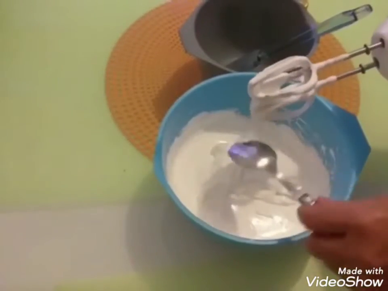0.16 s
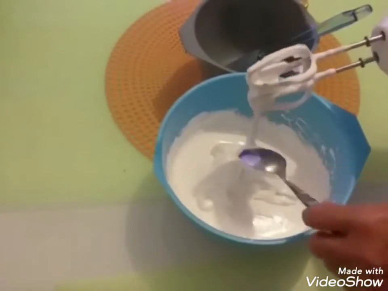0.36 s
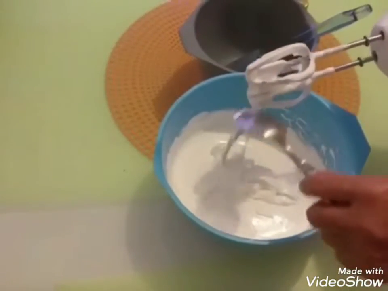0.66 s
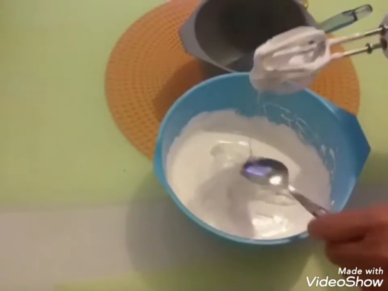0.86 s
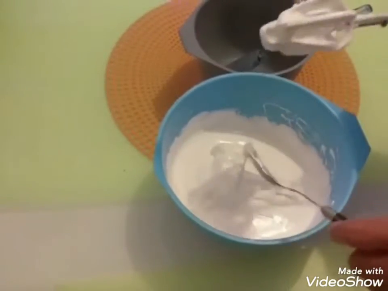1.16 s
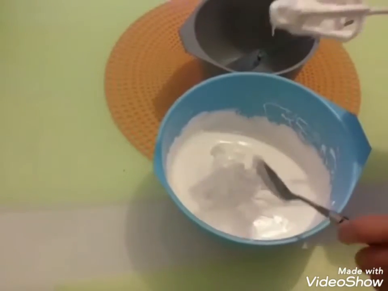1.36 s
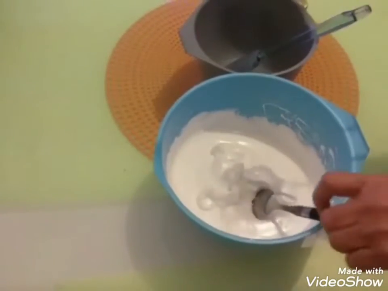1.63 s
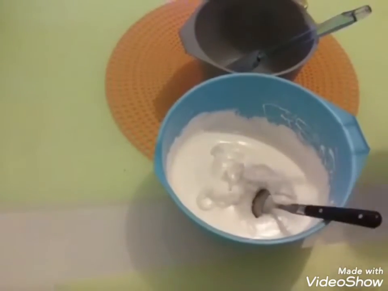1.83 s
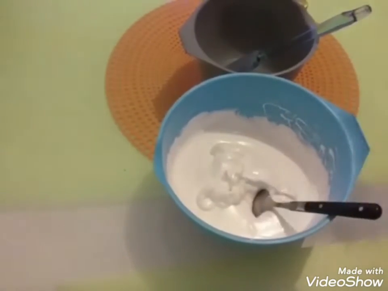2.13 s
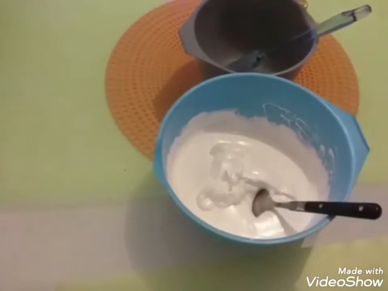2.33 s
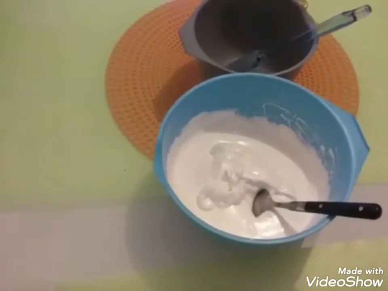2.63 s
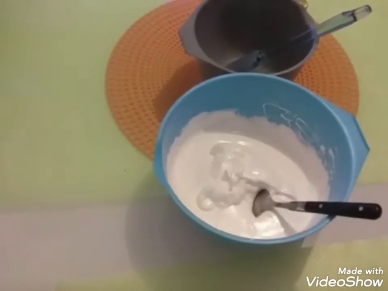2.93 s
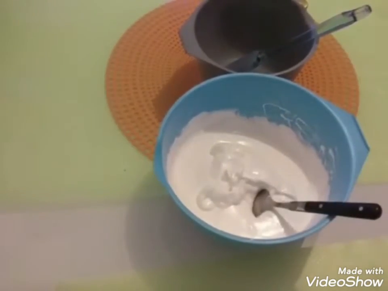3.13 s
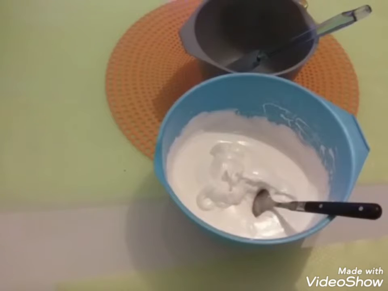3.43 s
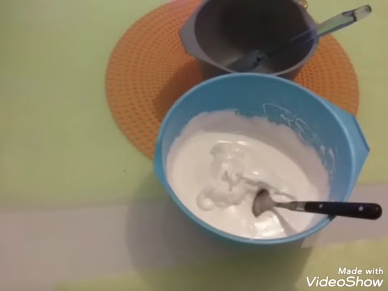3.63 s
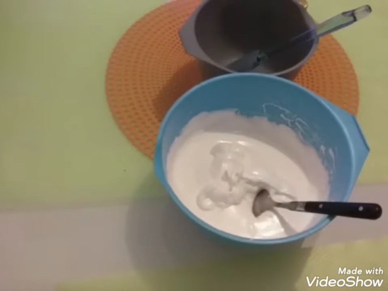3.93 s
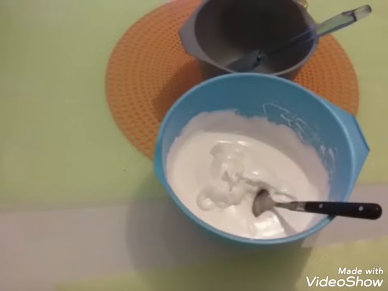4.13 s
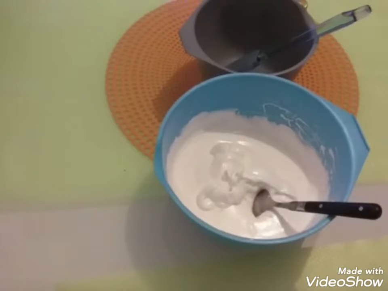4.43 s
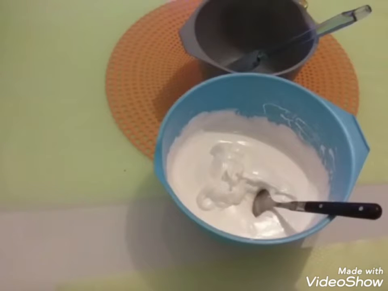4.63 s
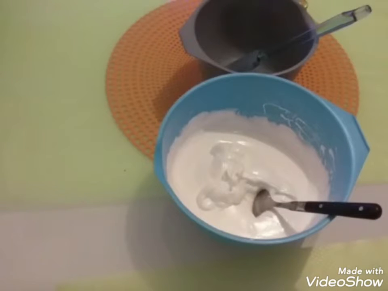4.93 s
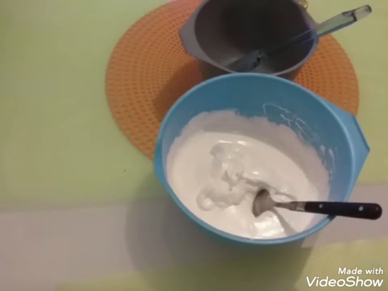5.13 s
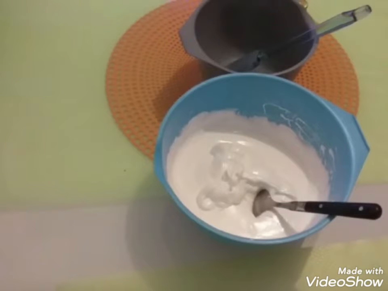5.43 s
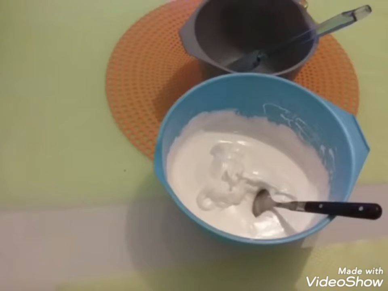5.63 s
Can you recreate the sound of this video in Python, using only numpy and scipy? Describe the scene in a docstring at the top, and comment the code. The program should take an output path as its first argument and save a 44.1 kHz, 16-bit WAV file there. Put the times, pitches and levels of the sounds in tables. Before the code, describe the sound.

Metal taps and a knock on a plastic bowl, followed by farther clinks, a bumping, squealing drawer and a loud cupboard bang.

```python
"""A steel spoon taps cream off mixer beaters and is laid in a plastic bowl, close to a phone in a
hard-walled kitchen. Further off, a utensil and a dish clink, sleeves rustle, a small thing is put
down, a drawer bumps along squealing runners, and a cupboard door bangs, followed by a softer thud.
Each impact excites a body's damped modes and the room's reverberation; the squeals are stick-slip
friction. Thin high chirps come and go over a low appliance hum."""
import sys
import numpy as np
from scipy import signal
from scipy.fft import rfft, irfft
from scipy.io import wavfile
from scipy.ndimage import uniform_filter1d

SR = 44100
rng = np.random.default_rng(int(sys.argv[2]) if len(sys.argv) > 2 else 0)


def wav_record(signal):
    """Record a signal, one row per channel, as 16-bit PCM in the file named by sys.argv[1]."""
    frames = np.transpose(np.atleast_2d(signal))
    bounded = np.clip(frames, -1, 1)
    # unit amplitude maps onto the largest positive 16-bit level
    quanta = np.round(bounded * 32767).astype(np.int16)
    wavfile.write(sys.argv[1], SR, quanta)


N = 254501
TIME = np.arange(N) / SR
RING = TIME[:SR]  # t/s within one event


def undb(db):
    """Amplitude ratio of a level in decibels."""
    return 10 ** (np.asarray(db) / 20)


def unit(x):
    """Normalisation to unit energy."""
    return x / np.sqrt(np.sum(x ** 2))


def at(points, hz):
    """Interpolation on a log-frequency axis."""
    f, value = np.transpose(points)
    return np.interp(np.log(np.maximum(hz, 1)), np.log(f), value)


def tint(x, colour, size=4096):
    """Minimum-phase filtering by a spectral envelope (f/Hz, gain/dB), through the folded cepstrum."""
    cepstrum = irfft(np.log(undb(at(colour, np.fft.rfftfreq(size, 1 / SR)))))
    cepstrum[1:size // 2] *= 2
    cepstrum[size // 2 + 1:] = 0
    return signal.fftconvolve(x, irfft(np.exp(rfft(cepstrum))))[:len(x)]


def noise(colour):
    """Filtered Gaussian noise of unit rms."""
    x = tint(rng.standard_normal(N), colour)
    return x / x.std()


def walk(rate):
    """Random modulation: `rate` Gaussian values a second, joined by lines."""
    knots = rng.standard_normal(int(N / SR * rate) + 2)
    return np.interp(TIME * rate, np.arange(len(knots)), knots)


def gesture(crest_s, rise_s, fade_db_per_s):
    """Envelope of a movement: Gaussian rise, exponential decay."""
    before, after = np.maximum(crest_s - TIME, 0), np.maximum(TIME - crest_s, 0)
    return np.exp(-2 * (before / rise_s) ** 2) * undb(-fade_db_per_s * after)


def add(track, start_s, sound, db, window_s):
    """Superposition of a sound, scaled so that its greatest short-time rms level is `db`."""
    peak_rms = np.sqrt(uniform_filter1d(sound ** 2, max(int(window_s * SR), 1)).max())
    start = int(start_s * SR)
    part = sound[max(-start, 0):N - start]
    track[max(start, 0):max(start, 0) + len(part)] += part * undb(db) / peak_rms


def kitchen(build_s=0.0003):
    """Diffuse reverberation: echoes build up, then decay exponentially, the treble first."""
    reverberation_times = [(100, 0.55), (400, 0.46), (1500, 0.55), (5000, 0.53), (9000, 0.44),
                           (16000, 0.23)]  # f/Hz, T60/s
    freqs, _, frames = signal.stft(rng.standard_normal(SR), SR, nperseg=256)
    age_s = np.linspace(0, 1, frames.shape[1])
    fade = np.exp(-np.log(1000) * age_s / at(reverberation_times, freqs)[:, None])
    tail = signal.istft(frames * fade)[1][:SR]
    return unit(tail * (1 - np.exp(-RING / build_s)) ** 2)


def ringing(modes, drive, beat_db, beat_rate, radians_per_db=0.83, scatter_db=1.5):
    """Damped modes store the drive's energy; interfering echoes make them beat in level and phase."""
    out = 0
    for hz, db, t60 in modes:
        energy = signal.lfilter([1], [1, -np.exp(-2 * np.log(1000) / (t60 * SR))], drive ** 2)
        swell = np.sqrt(energy) * undb(beat_db * walk(beat_rate)[:SR])
        tone = swell * np.sin(2 * np.pi * hz * RING + radians_per_db * beat_db * walk(beat_rate)[:SR])
        # each point of contact favours other modes
        out = out + undb(db + scatter_db * rng.standard_normal()) * unit(tone)
    return unit(out)


def blows(impacts, colour, modes, ring_db, beat_db=2.0, beat_rate=45, note_t60=0.015):
    """Impact excitation: contact chatter and its echoes drive a body and any note of the struck spot."""
    out = np.zeros(N)
    for start_s, level_db, contact_s, treble_db, room_db, *note in impacts:
        chatter = unit(RING / contact_s * np.exp(-2 * RING / contact_s) * rng.standard_normal(SR))
        drive = chatter + undb(room_db) * kitchen(build_s=contact_s)
        sound = unit(tint(drive, colour)) + undb(ring_db) * ringing(modes, drive, beat_db, beat_rate)
        if note:
            note_hz, note_db = note
            sound += undb(note_db) * ringing([(note_hz, 0, note_t60)], drive, beat_db, beat_rate)
        sound = tint(sound, [(800, 0.0018), (14000, treble_db)])  # harder contact, more treble
        add(out, start_s, sound, level_db, window_s=0.0002 + 2 * contact_s)
    return out


def squeaks(bursts, tones, waver, rasp_db, room_db):
    """Random frequency modulation: bursts of unsteady tones and rasp reverberate in the room."""
    out = np.zeros(N)
    for start_s, length_s, level_db in bursts:
        gate = np.sqrt(np.sin(np.pi * np.minimum(RING / length_s, 1)).clip(0))
        rasp = tint(rng.standard_normal(SR), [(tones[0][0] / 2, -60)] + list(tones))
        sound = undb(rasp_db) * unit(gate * rasp)
        for hz, db in tones:
            pitch_hz = hz * (1 + waver * walk(390)[:SR])
            sound += undb(db) * unit(gate * np.sin(2 * np.pi * np.cumsum(pitch_hz) / SR))
        echoes = undb(room_db) * signal.fftconvolve(sound, kitchen())[:SR]
        add(out, start_s, sound + echoes, level_db, window_s=0.0012)
    return out


def still_air():
    """Ambient noise floor: stationary and strongest in the bass."""
    colour = [(25, 0), (97, 2.5), (229, -12), (384, -10.5), (641, -33.5), (887, -8.5), (1650, -16),
              (3920, -21.5), (7710, -24), (9320, -31.5), (14800, -20), (16000, -32.5)]  # spectral envelope: f/Hz, gain/dB
    return undb(-68) * noise(colour)


def appliance_hum():
    """A line spectrum whose partials waver in amplitude and frequency."""
    partials = [(86.1, -72.5), (134.6, -69.5), (226.1, -83.5)]  # f/Hz, level/dB
    out = 0
    for hz, db in partials:
        amplitude = undb(db + 2.0 * walk(2.0))
        pitch_hz = hz * (1 + 0.024 * walk(46))
        out = out + amplitude * np.sin(2 * np.pi * np.cumsum(pitch_hz) / SR)
    return out


def movement_rumble(fade_db_per_s=33):
    """Low noise swells with each movement; incoherent swells add in power."""
    swells = [(0.021, .1, -62.5), (1.049, 0.41, -61), (1.95, 0.49, -56.5), (2.55, 0.88, -61),
              (3.53, 0.15, -63)]  # crest t/s, rise/s, relative level/dB
    rumble = noise([(35, -55), (85, 4), (135, -6), (200, -9), (400, -9.5), (900, -27.5), (3000, -44.5)])
    power = sum((undb(db) * gesture(s, rise_s, fade_db_per_s)) ** 2 for s, rise_s, db in swells)
    return undb(-2) * np.sqrt(power) * rumble


def high_chirps():
    """Thin bursts of high noise over weaker inharmonic partials."""
    chirps = [(1.11, 0.029, -57), (1.31, 0.029, -53.5), (2.545, 0.027, -44.5), (2.66, 0.076, -37.5),
              (4.0, 0.05, -34), (5.632, 0.088, -44)]  # t/s, length/s, level/dB
    partials = [(6352, -8.5), (8592, -7.5), (10290, -3), (10975, 0.5), (12204, 2), (13200, -8), (14200, 5),
                (15350, 8)]  # f/Hz, relative level/dB
    return squeaks(chirps, partials, waver=0.007, rasp_db=11, room_db=-2.0)


def sleeve_rustle(hiss_fade_db_per_s=61, sheen_fade_db_per_s=96):
    """Friction noise of cloth: swells of grainy hiss whose top-octave sheen decays first."""
    strokes = [(.89, 0.033, -60.5, -26), (1.425, 0.013, -67.5, -21), (1.883, 0.087, -52, -16),
               (2.01, 0.21, -61, 4.5), (2.13, 0.068, -51.5, -1.5), (2.23, .06, -64, 7),
               (2.97, 0.26, -58.5, -3), (3.085, 0.072, -50, -5), (3.29, 0.22, -62.5, 5),
               (3.46, 0.026, -56.5, -22.5), (3.601, 0.084, -43.5, -1), (3.81, .1, -58.5, -9),
               (3.93, 0.14, -75.5, 21)]  # crest t/s, rise/s, relative level/dB, sheen/dB
    colour = [(120, -11), (200, 4.5), (294, -23), (416, -7.5), (683, -0.5), (4770, 5), (7970, 2.5),
              (9060, -10.5), (15000, -43)]  # spectral envelope: f/Hz, gain/dB
    hiss_power, sheen_power = 0, 0
    for crest_s, rise_s, db, sheen_db in strokes:
        hiss_power += (undb(db) * gesture(crest_s, rise_s, hiss_fade_db_per_s)) ** 2
        sheen_power += (undb(db + sheen_db - 3) * gesture(crest_s, rise_s, sheen_fade_db_per_s)) ** 2
    sheen = noise([(8000, -20), (10500, 0), (16000, 0)])
    grain = undb(-1 + 1.5 * walk(170))
    return grain * (np.sqrt(hiss_power) * noise(colour) + np.sqrt(sheen_power) * sheen)


def small_knock():
    """Impact of a light thing put down: two weak modes, quickly damped."""
    knocks = [(3.158, -41.5, 0.0029, -12.5, 2.5)]  # t/s, level/dB, contact/s, treble/dB, room/dB
    colour = [(290, -49), (500, -19), (1130, -13), (1320, 0.5), (1800, -13), (2640, -9), (5000, -7),
              (16000, -23)]  # body response: f/Hz, gain/dB
    modes = [(1414, -2, 0.06), (2640, 1, .03)]  # f/Hz, level/dB, T60/s
    return blows(knocks, colour, modes, ring_db=-13)


def cupboard_thud():
    """A second, softer and duller impact on the cupboard excites heavily damped modes."""
    thuds = [(5.470, -25.5, 0.0042, -2, 15.5)]  # t/s, level/dB, contact/s, treble/dB, room/dB
    colour = [(35, -66), (60, -35), (125, -34), (180, -15), (330, 4), (579, -4.5), (924, -6.5), (1130, 3.5),
              (2100, -8.5), (3040, -18), (4200, -10.5), (16000, -46)]  # body response: f/Hz, gain/dB
    modes = [(118, 0, .1), (350, 5, .06), (775, 1, .04), (867, -3, .04), (1085, 1, .04), (1475, 0, .04),
             (1766, -3, .05), (2143, -4, .05)]  # f/Hz, level/dB, T60/s
    return blows(thuds, colour, modes, ring_db=-2, beat_db=3)


def runner_squeals():
    """Stick-slip friction makes the drawer's runners oscillate."""
    squeals = [(4.395, 0.032, -34), (4.52, 0.038, -32.5), (4.617, 0.025, -37), (4.76, 0.039, -39),
               (4.855, 0.028, -45), (5.225, 0.03, -45.5), (5.29, 0.023, -56)]  # t/s, length/s, level/dB
    partials = [(2565, 1.5), (5640, 13.5), (8950, -9.5), (10800, -1)]  # f/Hz, relative level/dB
    return squeaks(squeals, partials, waver=0.005, rasp_db=-7, room_db=-2.5)


def drawer_bumps():
    """Impacts excite the drawer's low resonances; its note changes as it moves."""
    bumps = [(4.036, -33, 0.007, 9.5, 13.5, 528, 0.5), (4.068, -36, 0.0054, 9.5, 18, 437, -5),
             (4.323, -44.5, 0.0037, 20, 20, 779, -2), (4.349, -36, 0.0041, 25, 10, 262.6, -3),
             (4.475, -31, 0.013, -3.5, -0.5, 396.6, -0.5), (4.55, -40.5, 0.031, 17, -3.5, 418, 3.5),
             (4.635, -41, 0.031, 3, 4, 487, 1), (4.68, -33, 0.0069, 32, 22, 782, -7),
             (4.715, -28.5, 0.0094, -7, 2.5, 387, 0), (4.742, -30, 0.0074, -20, -2.5, 664, -1.5),
             (4.991, -52.5, 0.014, 16, 3, 1400, -16)]  # t/s, level/dB, contact/s, treble/dB, room/dB, note f/Hz, note/dB
    colour = [(70, -24), (190, -10), (307, -8), (430, 2), (720, -8), (1100, -11.5), (2120, -15),
              (5200, -19.5), (7730, -28), (11900, -44.5), (16000, -35)]  # body response: f/Hz, gain/dB
    modes = [(246.2, -3.5, 0.07), (512, 3, 0.04), (750, -4, 0.04)]  # f/Hz, level/dB, T60/s
    return blows(bumps, colour, modes, ring_db=-4, beat_db=2.5, note_t60=0.04)


def cupboard_door():
    """Panel vibration: the door meets its frame, rattles and rebounds."""
    bangs = [(5.033, -20, 0.0085, 4, 0.5, 1890, -10), (5.038, -13.5, 0.013, 2.5, 0.5, 2532, -13.5),
             (5.046, -19, 0.0072, -3, -9, 794, 9), (5.068, -23.5, 0.018, -9, -4, 1079, 16),
             (5.134, -23, 0.013, -40, -2, 400, -7.5)]  # t/s, level/dB, contact/s, treble/dB, room/dB, note f/Hz, note/dB
    colour = [(40, -55), (70, -44), (118, -25), (227, -16.5), (350, -12.5), (600, -6.5), (1100, -11.5),
              (1700, -9), (2400, -9), (3700, -17), (7750, -25), (9300, -40.5), (16000, -42)]  # body response: f/Hz, gain/dB
    modes = [(118, -8, .12), (360, -3, .09), (490, -6, .2), (538, -7, .15), (788, -1, .04), (1085, 3, .09),
             (1269, -1, .06), (1395, 2, .07), (1573, 0, .04), (1701, 0, .07), (1860, -1, .04),
             (1978, 0, .06), (2023, 1, .07), (2145, 0, .07), (2535, -9, .05), (3200, -7, .06),
             (4967, -11, .04)]  # f/Hz, level/dB, T60/s
    return blows(bangs, colour, modes, ring_db=-1, beat_db=1.9, note_t60=0.07)


def dish_clink():
    """Light damping lets the struck dish ring on; closely spaced modes beat."""
    clinks = [(2.4455, -24, 0.0016, 11.5, 12)]  # t/s, level/dB, contact/s, treble/dB, room/dB
    colour = [(80, -21), (222, 8), (296, -20), (550, -17), (751, -6), (1140, -3.5), (1530, -6), (2220, -3),
              (2840, -17.5), (3240, -6), (7870, -18.5), (9200, -36.5), (16000, -44)]  # body response: f/Hz, gain/dB
    modes = [(1954, -9, 1.8), (1959.3, -19, 1.5), (3112, -7, .3), (3138, -6, .5), (3176, -4, .5),
             (1160, -4, .04), (2160, -2, .045), (3305, -7, .35), (3386, -9, .3), (4190, -10, .4),
             (4474, -8, .06), (4975, -10, .089), (6430, -13, .1)]  # f/Hz, level/dB, T60/s
    return blows(clinks, colour, modes, ring_db=-0.5, beat_db=1)


def utensil_clink():
    """A distant utensil rings; the reverberant field outweighs the direct sound."""
    clinks = [(2.2665, -29, 0.0012, 2, 27)]  # t/s, level/dB, contact/s, treble/dB, room/dB
    colour = [(240, -37), (900, -23.5), (1200, -7.5), (1650, -16.5), (2180, -10), (2500, -12), (4200, -11),
              (7900, -16), (9000, -29.5), (16000, -29)]  # body response: f/Hz, gain/dB
    modes = [(1200, -8, .06), (1970, -9, .08), (2215, -3, .1), (3085, -5, .12), (3290, -6, .1),
             (4020, -1, .08), (4470, -7, .12), (5030, -4, .1), (6130, -8, .1), (6550, -8, .1)]  # f/Hz, level/dB, T60/s
    return blows(clinks, colour, modes, ring_db=-1, beat_rate=110)


def spoon_on_bowl():
    """Damping in plastic: the bowl's modes die quickly, leaving the note of the struck spot."""
    knocks = [(-.03, -43.5, 0.0045, -29, -7, 232, 6), (1.6583, -27.5, 0.0019, 5.5, -0.5, 1100, -20),
              (2.123, -51.5, 0.0033, -2, -5.5, 271, -0.5)]  # t/s, level/dB, contact/s, treble/dB, room/dB, note f/Hz, note/dB
    colour = [(30, -41.5), (70, -4), (130, -14), (300, 2.5), (380, -4), (500, -2), (1200, -1),
              (2500, -16.5), (7600, -27), (16000, -82.5)]  # body response: f/Hz, gain/dB
    modes = [(905, 2.7, 0.032), (1270, 9.5, 0.021)]  # f/Hz, level/dB, T60/s
    return blows(knocks, colour, modes, ring_db=-8, note_t60=0.26)


def steel_taps():
    """Brief contact gives a bright spectrum: the spoon taps the beaters, then ticks as it is let go."""
    taps = [(-.06, -29.5, 0.0019, 1, 0, 4600, -3), (.0922, -18.5, 0.0013, 10, -6, 3435, -4),
            (.0958, -27.5, 0.0033, -8.5, -3.5, 3666, -2), (.1483, -29.5, 0.0014, -15.5, -6, 1543, -7),
            (.152, -26.5, 0.0048, 26, -10.5, 4630, 1.5), (.1575, -28.5, 0.0051, -1, -15, 7760, -10.5),
            (.2955, -33, 0.003, -9.5, -3, 1870, -3), (.3225, -32, 0.0043, -3, -9, 1940, -3.5),
            (.5032, -20, 0.00089, 11, -6, 2300, -13), (.5303, -18, 0.0022, -2, -8, 7530, -5.5),
            (.574, -32, 0.0022, -5, -11, 3850, -14), (1.05, -55.5, 0.0018, -30, -1, 1880, -12),
            (2.0973, -33.5, 0.0006, -2, -11, 1710, -7), (3.0645, -38, 0.00022, 14, -23, 3480, -11)]  # t/s, level/dB, contact/s, treble/dB, room/dB, note f/Hz, note/dB
    colour = [(120, -92), (200, -36), (448, -10.5), (635, -10), (867, -26), (1120, -10), (1840, -11.5),
              (2600, -6.5), (3500, -5), (5300, -9), (6200, -13), (7800, -8.5), (8800, -21.5),
              (16000, -16.5)]  # body response: f/Hz, gain/dB
    modes = [(1316, -2.5, 0.05), (1880, -5, 0.42), (2490, -5, 0.03), (3210, -4, 0.03), (3820, -0.5, 0.024),
             (4580, -2.5, 0.052), (5350, -3, 0.078), (7070, 3.5, 0.011)]  # f/Hz, level/dB, T60/s
    return blows(taps, colour, modes, ring_db=-7, beat_rate=260)


def scene():
    """Superposition in mid-side stereo; only the chirps have width."""
    spoon = steel_taps() + spoon_on_bowl()
    clatter = utensil_clink() + dish_clink() + small_knock()
    furniture = drawer_bumps() + cupboard_door() + cupboard_thud() + runner_squeals()
    chirps, side = high_chirps(), undb(-19.5) * high_chirps()
    background = sleeve_rustle() + appliance_hum() + movement_rumble() + still_air()
    mid = spoon + clatter + furniture + chirps + background
    return np.array([mid + side, mid - side])


def record(dry, bass_hz=52, top_hz=15900):
    """Band limiting: the phone thins the deep bass and cuts the top."""
    thin = signal.sosfilt(signal.butter(3, bass_hz, "high", fs=SR, output="sos"), dry)
    return signal.sosfilt(signal.ellip(10, .2, 80, top_hz, fs=SR, output="sos"), thin)


dry = scene()
out = record(dry)
wav_record(out)
```